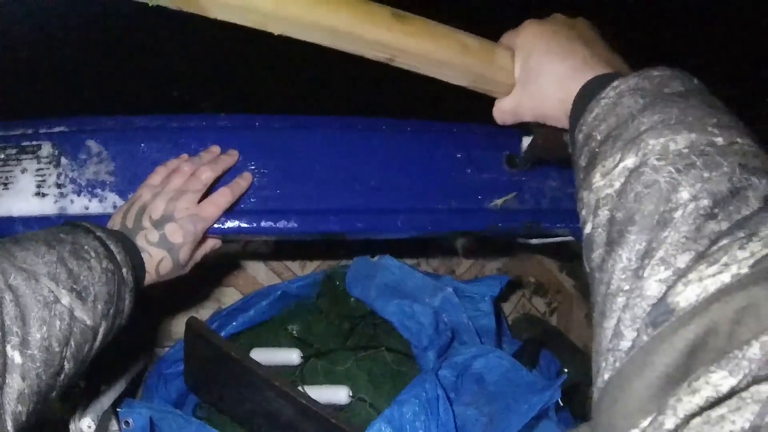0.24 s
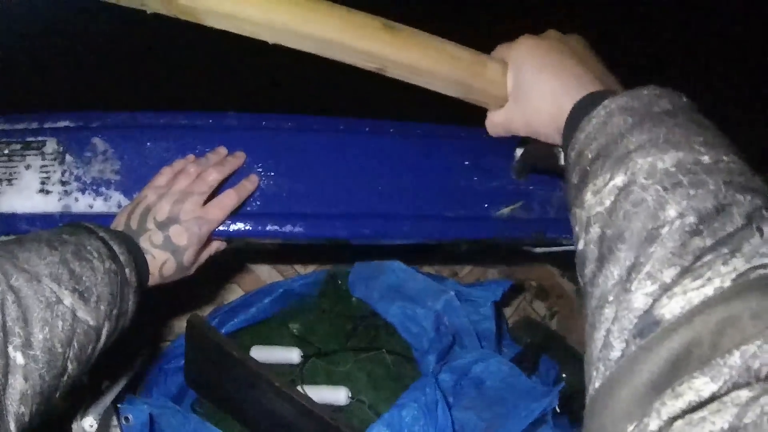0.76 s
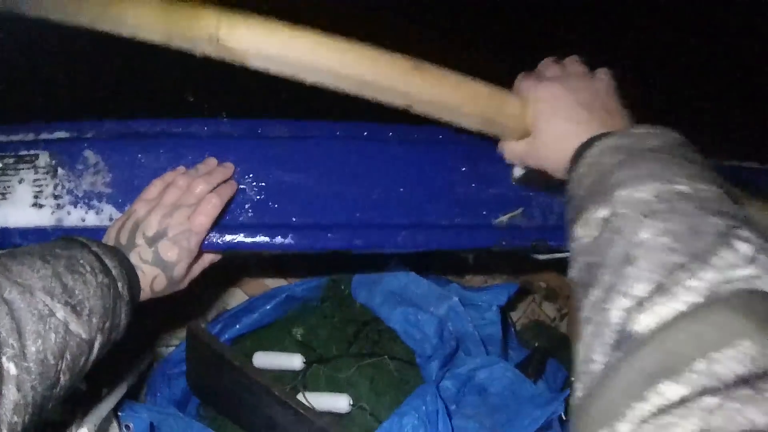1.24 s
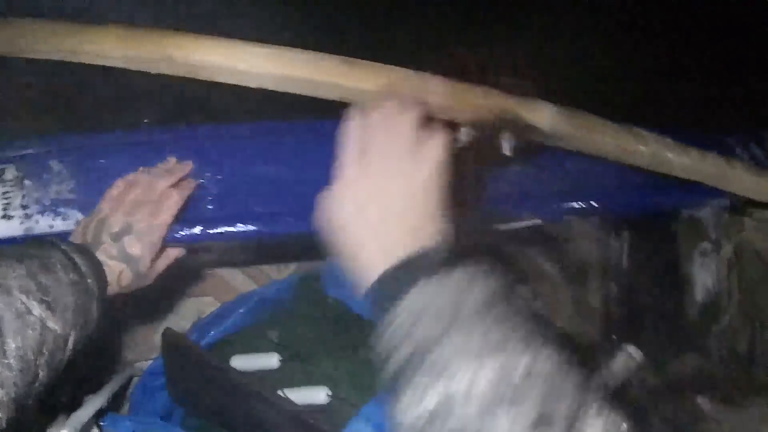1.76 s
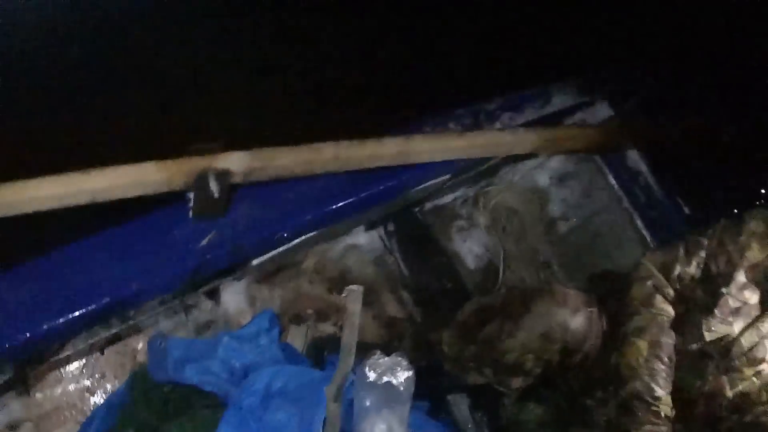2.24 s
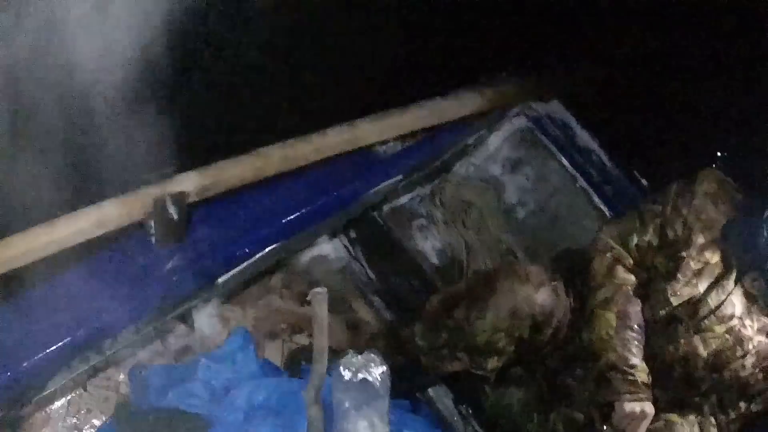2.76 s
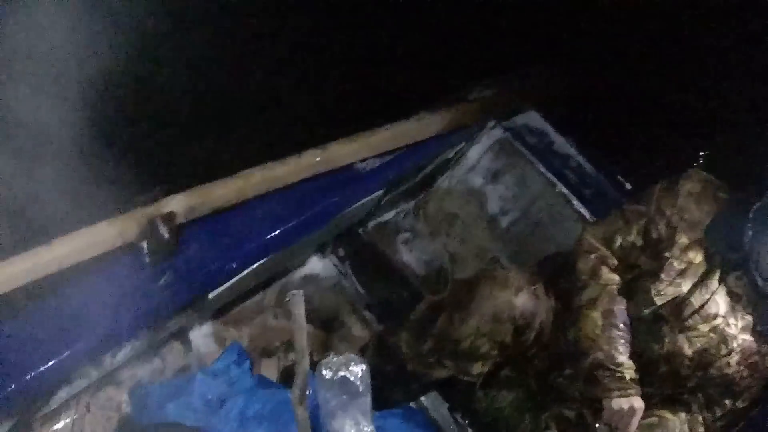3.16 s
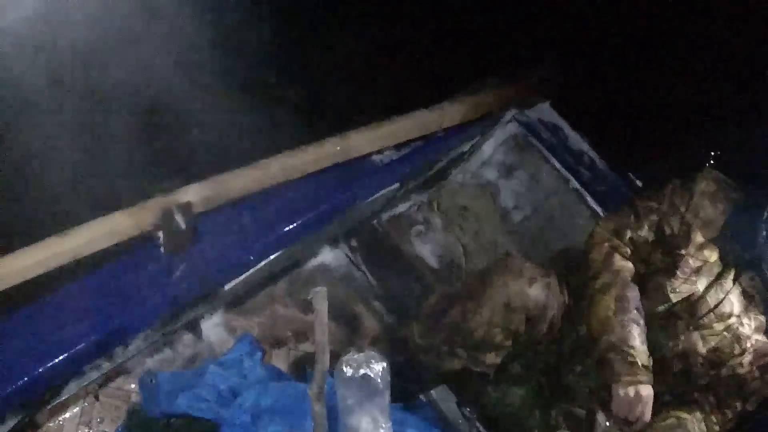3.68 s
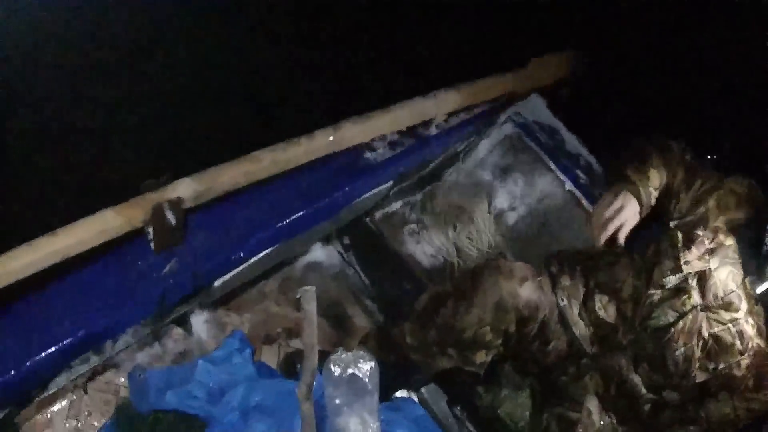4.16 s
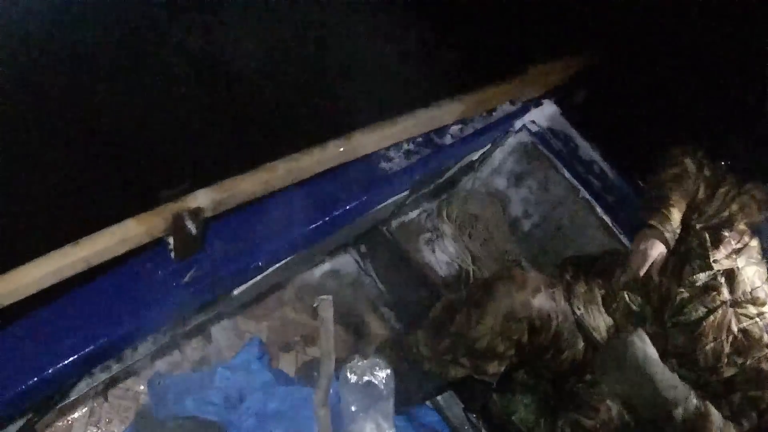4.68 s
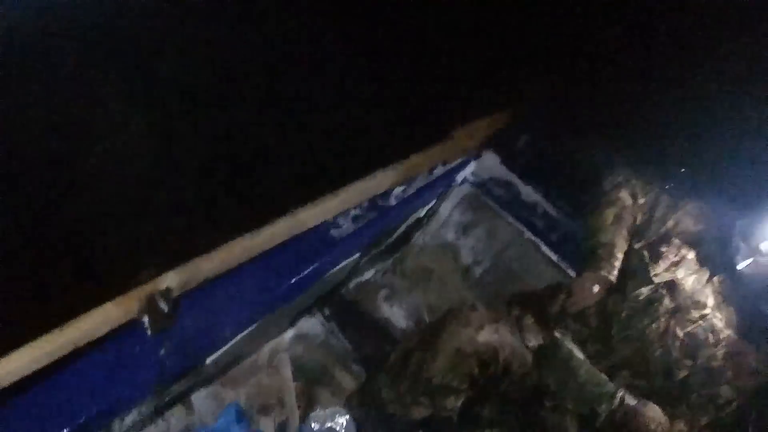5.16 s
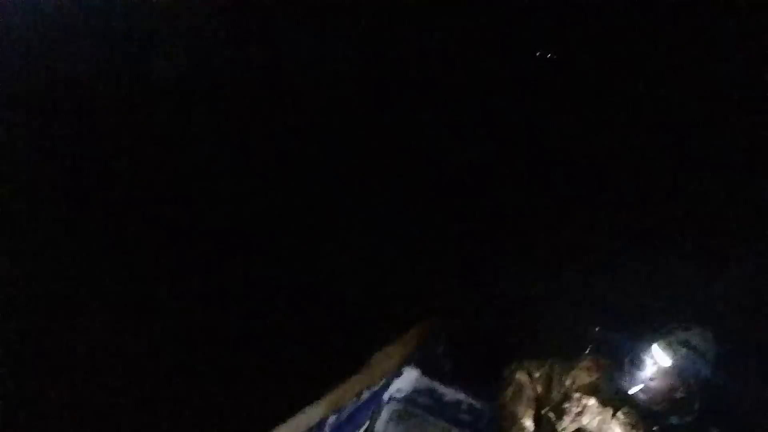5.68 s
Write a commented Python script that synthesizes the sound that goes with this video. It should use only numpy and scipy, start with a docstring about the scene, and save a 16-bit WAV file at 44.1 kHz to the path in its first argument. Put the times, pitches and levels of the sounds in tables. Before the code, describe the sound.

On still water at night, an oar clicks, drags and drops with one hard knock against a small boat, followed by lighter knocks.

```python
"""A low night drone and light clicks from an oarlock: a wooden oar is swung inboard on a small boat.
It scrapes, rattles in the lock and drops on the side with one hard knock; lighter knocks and a clatter
follow. Each blow is a thud on wood and a clack in the lock, both ringing the modes of hull and oar.
Air pockets sing as water laps the hull, and a jacket rustles. Still, open water: no echo."""
import sys
import numpy as np
from scipy import signal
from scipy.fft import rfft, irfft, next_fast_len
from scipy.io import wavfile

SR = 44100
rng = np.random.default_rng(int(sys.argv[2]) if len(sys.argv) > 2 else 0)


def generate_wav(signal):
    """Clip the signal to [-1, 1] and save it as 16-bit WAV at the path in sys.argv[1]."""
    frames = np.transpose(np.atleast_2d(signal))
    scaled = np.clip(frames, -1, 1) * 32767
    pcm = np.round(scaled).astype(np.int16)
    wavfile.write(sys.argv[1], SR, pcm)


N = 261557

# background spectrum (frequency [Hz], relative density [dB])
NIGHT_SPECTRUM = [(12, -21), (22, -9), (40, -3.5), (120, -5.5), (165, -11.5), (230, -3.5), (370, -9.5),
                  (480, -18), (650, -23.5), (1300, -33.5), (4000, -34), (8000, -36), (15000, -39.5)]
# background left-right likeness (frequency [Hz], correlation [0-1])
NIGHT_CORRELATION = [(1000, 1), (2500, 0.99), (5000, 0.71), (8000, 0.44), (15000, 0.31)]
# distant drone, thin whine (centre [Hz], width [Hz], level [dB])
DRONE_BANDS = [(284.7, 14, -56.5), (9630, 140, -85.5)]
# cloth friction spectrum (frequency [Hz], gain [dB])
CLOTH_SPECTRUM = [(300, 0), (800, 1.5), (1400, 1.5), (1800, 3.5), (2200, 1), (2700, -0.5), (3400, -7),
                  (4300, -5.5), (5200, -10.5), (6400, -11), (8000, -23.5), (14000, -37)]
# arm and body moves (start [s], length [s], level [dB])
JACKET_MOVES = [(.95, 0.38, -56.5), (1.4, .1, -51.5), (1.8, 0.15, -56.5), (1.94, 0.65, -55),
                (3.08, 0.19, -60.5), (3.68, .5, -63), (4.16, .11, -54.5), (4.63, 0.34, -59),
                (5.32, 0.69, -56)]
# water at the hull (start [s], length [s], start pitch [Hz], end pitch [Hz], level [dB], froth [0-1])
WATER_LAPS = [(.74, 0.044, 940, 750, -60, 0), (0.885, 0.074, 812, 684, -55.5, 0.4),
              (0.892, 0.053, 1195, 1210, -58, 0.1), (2.836, 0.027, 573, 686, -54.5, 0.1),
              (2.863, 0.026, 650, 600, -58, 0.1), (3.408, 0.036, 488, 854, -55.5, 0),
              (3.438, 0.028, 955, 1350, -63.5, 0), (3.512, 0.026, 950, 770, -57, 1),
              (3.531, 0.044, 680, 533, -57, 0.3), (3.785, 0.045, 1270, 1500, -61, 1),
              (4.262, 0.073, 776, 635, -59, 0)]
# main modes of hull and oar (frequency [Hz], relative level [dB], t60 [s])
BOAT_MODES = [(65.3, -12, 1), (85.75, -9, 0.67), (103.7, -15, 0.46), (124, -18.5, 0.61),
              (171.3, -12.5, 0.22), (180.5, -9, 0.17), (227.4, -12, 0.24), (294.2, -1, 0.24),
              (316, -4.5, 0.12), (390.3, -3.5, 0.18), (439, 5, 0.08), (522.4, 1, 0.12), (605, -4, 0.094),
              (645, -8, 0.065), (712, -5, 0.053), (767, 0, 0.12), (874, -13.5, 0.082), (931, -1, 0.0816),
              (1011, -2.5, .09), (1192, 0, 0.084), (1245, -18, 0.08), (1435, -10, 0.084),
              (1668, -10.5, 0.0517), (2114, -10.5, 0.052), (2260, -15, 0.067), (2534, -12.5, 0.063),
              (2770, -3.5, 0.02), (2980, -12, 0.045), (3600, -21, 0.04), (4115, -3.5, 0.022)]
# dense weak modes between them (frequency [Hz], relative density [dB])
DENSE_SPECTRUM = [(40, -15.5), (70, -17.5), (115, -6.5), (170, 3.5), (330, -0.5), (550, -2), (1050, -5),
                  (2000, -13.5), (2800, -17.5), (4200, -14.5), (4900, -19), (6700, -16.5), (7900, -33),
                  (15000, -43)]
# their decay (frequency [Hz], t60 [s])
DENSE_DECAY = [(80, 0.54), (250, 0.14), (500, 0.17), (1000, 0.098), (2500, 0.057), (6000, 0.041),
               (12000, 0.036)]
# oar dragging in the lock and along the side (start [s], length [s], level [dB])
OAR_DRAGS = [(.66, 0.22, -51.5), (.975, 0.17, -44), (1.22, 0.14, -47.5), (1.355, 0.1, -46),
             (2.03, 0.23, -51.5), (2.47, 0.14, -50), (3.05, 0.085, -49), (3.15, 0.16, -45),
             (4.945, 0.1, -37.5), (5.07, 0.15, -42)]
# oar blows (time [s], thud level [dB], hollow note [Hz], slack [s], clack level [dB], clink [Hz])
OAR_BLOWS = [(0.093, -75, 230, 0, -43.5, 3800), (0.456, -55.5, 170, 0.0026, -77, 4020),
             (0.662, -50.5, 220, 0, -74, 2780), (0.998, -50, 510, 0.0052, -72, 2670),
             (1.024, -44.5, 350, 0.023, -72, 2200), (1.076, -57, 250, 0.005, -48.5, 6040),
             (1.087, -44.5, 217, 0.0079, -50.5, 1540), (1.109, -47.5, 440, 0, -32, 3060),
             (1.183, -45.5, 1000, 0, -43.5, 1340), (1.194, -39.5, 490, 0, -48.5, 2750),
             (1.222, -31.5, 247, 0, -40, 5040), (1.286, -39.5, 183, .004, -43.5, 3095),
             (1.4701, -17.5, 578, 0.00073, -15.5, 2780), (1.502, -28, 304, 0.00075, -41.5, 6240),
             (1.511, -40, 507, 0.00099, -31, 2470), (1.575, -42, 157, 0.0099, -67, 2800),
             (2.155, -53, 260, 0, -64, 2600), (2.214, -49.5, 340, 0.0027, -51, 1660),
             (2.512, -49.5, 99, 0.0028, -57, 2800), (2.563, -48.5, 104, 0.00094, -55.5, 2870),
             (3.051, -49, 403, 0, -45, 2090), (3.056, -47.5, 460, 0.0045, -45, 2870),
             (3.069, -48, 124, 0, -46, 2800), (3.221, -54, 520, 0.0049, -49, 2820),
             (3.236, -39, 490, 0, -48, 2380), (3.678, -71.5, 900, 0, -56.5, 1560),
             (3.944, -51, 1050, 0, -49, 2350), (4.338, -57, 130, 0, -80, 3230),
             (4.668, -48.5, 235, 0.0026, -53.5, 2480), (4.944, -29.5, 370, .005, -38.5, 4060),
             (4.962, -29, 193, 0.0015, -43.5, 2550), (4.999, -58, 330, 0.0014, -44, 3960),
             (5.067, -30, 443, 0.014, -48.5, 2860), (5.122, -37, 920, 0.013, -43.5, 3960),
             (5.148, -33.5, 203, 0, -44.5, 1530), (5.297, -59.5, 280, 0.0025, -59.5, 2160),
             (5.747, -51, 288, 0, -53, 2000)]
# boom, knock, crack and tick bands (low edge [Hz], centre [Hz], high edge [Hz])
ATTACK_BANDS = [(50, 200, 350), (350, 700, 1400), (1400, 2600, 4500), (4500, 6000, 12000)]
# band offsets of thud and clack (boom [dB], knock [dB], crack [dB], tick [dB])
THUD_OFFSETS_DB = (0.5, -0.5, -15.5, -43)
CLACK_OFFSETS_DB = (-20, -10, 1, -19)


def gain_of(db):
    """Decibels to amplitude."""
    return 10 ** (np.asarray(db) / 20)


def unit_rms(x):
    """Scales to rms 1."""
    return x / np.sqrt(np.mean(x ** 2) + 1e-20)


def lookup(table, hz):
    """Interpolates on a log-frequency axis."""
    table_hz, value = np.transpose(table)
    return np.interp(np.log(hz + 1), np.log(table_hz + 1), value)


def add(mix, start_s, sound):
    """Mixes a sound in at start_s."""
    part = mix[round(start_s * SR):][:len(sound)]
    part += sound[:len(part)]


def coloured(x, spectrum):
    """Zero-phase filter, output at rms 1."""
    size = next_fast_len(len(x), True)
    gain = gain_of(lookup(spectrum, np.fft.rfftfreq(size, 1 / SR)))
    return unit_rms(irfft(rfft(x, size) * gain, size)[:len(x)])


def min_phase(x, spectrum, size=4096):
    """Minimum-phase filter: nothing sounds before the blow."""
    gain = gain_of(lookup(spectrum, np.fft.rfftfreq(size, 1 / SR)))
    cepstrum = irfft(np.log(gain))
    cepstrum[1:size // 2] *= 2
    cepstrum[size // 2 + 1:] = 0
    taps = np.array(irfft(np.exp(rfft(cepstrum))), ndmin=x.ndim)
    return signal.fftconvolve(x, taps, axes=-1)[..., :x.shape[-1]]


def resonance(x, hz, q, db):
    """Adds one resonant peak."""
    return x + gain_of(db) * signal.lfilter(*signal.iirpeak(hz, q, SR), x)


def wander(rate_hz, size):
    """Low-passed noise, rms 1."""
    return coloured(rng.standard_normal(size), [(rate_hz, 0), (2 * rate_hz, -30), (8 * rate_hz, -120)])


def strokes(moves, skew, roundness):
    """Sliding envelope: each move speeds up and slows in one arch."""
    out = np.zeros(N)
    for start_s, length_s, db in moves:
        progress = np.linspace(0, 1, int(length_s * SR))
        add(out, start_s, gain_of(db) * abs(np.sin(np.pi * progress ** skew)) ** roundness)
    return out


def attack_db(x, low_hz=0, high_hz=SR, size=1024):
    """Band level over the first samples."""
    hz = np.fft.rfftfreq(2 * size, 1 / SR)
    fade = np.minimum(np.linspace(5, 0, size), 1)
    power = abs(rfft(x[:size] * fade, 2 * size)) ** 2
    return 10 * np.log10(power[(hz >= low_hz) & (hz < high_hz)].sum() / size ** 2 + 1e-20)


def voiced(ring, bands_db):
    """Filters a ring towards the given attack levels of boom, knock, crack and tick."""
    spectrum = [(centre_hz, db - attack_db(ring, low_hz, high_hz))
                for db, (low_hz, centre_hz, high_hz) in zip(bands_db, ATTACK_BANDS)]
    return min_phase(ring, spectrum)


def night(air_db=-51, swell_db=2.03, swell_hz=4.9):
    """Wavering rumble, drone and whine in the centre; fine hiss spread wide."""
    size = next_fast_len(N, True)
    hz = np.fft.rfftfreq(size, 1 / SR)
    correlation = np.clip(lookup(NIGHT_CORRELATION, hz), 0, 1)
    spectra = rfft(rng.standard_normal((2, size))) * gain_of(lookup(NIGHT_SPECTRUM, hz))
    mid, side = spectra * np.sqrt([1 + correlation, 1 - correlation])
    air = gain_of(air_db) * unit_rms(irfft(np.array([mid + side, mid - side]), size))
    rumble = signal.sosfilt(signal.butter(1, 400, fs=SR, output="sos"), air)
    air += rumble * (gain_of(swell_db * wander(swell_hz, size)) - 1)
    for centre_hz, width_hz, db in DRONE_BANDS:
        peak = 1 / (1 + (2 * (hz - centre_hz) / width_hz) ** 2)
        air += gain_of(db) * unit_rms(irfft(rfft(rng.standard_normal(size)) * peak, size))
    return air[:, :N]


def jacket(floor_db=-63.5, grain_db=1.5, grain_hz=107):
    """Cloth slides on cloth in small uneven catches, never quite at rest."""
    speed = np.hypot(gain_of(floor_db), strokes(JACKET_MOVES, skew=0.93, roundness=0.49))
    friction = rng.standard_normal(N) * gain_of(grain_db * wander(grain_hz, N))
    return speed * coloured(friction, CLOTH_SPECTRUM)


def laps(waver=0.1, waver_hz=140, noise_size=8192):
    """Air pockets close against the hull: a short gliding note in a splash of froth."""
    out = np.zeros(N)
    for start_s, length_s, start_hz, end_hz, db, froth in WATER_LAPS:
        size = int(length_s * SR)
        hz = np.geomspace(start_hz, end_hz, size) * (1 + waver * wander(waver_hz, noise_size)[:size])
        note = unit_rms(np.sin(2 * np.pi * np.cumsum(hz) / SR))
        spectrum = [(start_hz / 3, -18), (start_hz, 0), (start_hz * 2, -11), (start_hz * 8, -40)]
        splash = coloured(rng.standard_normal(noise_size), spectrum)[:size]
        envelope = np.sin(np.pi * np.sqrt(np.linspace(0, 1, size)))
        lap = envelope * (np.sqrt(1 - froth) * note + np.sqrt(froth) * splash)
        add(out, start_s, gain_of(db) * unit_rms(lap))
    return out


def main_modes(count, t, spread_db=3.5, spread_rad=1.0):
    """Damped modes of hull and oar; each struck spot favours different ones."""
    hz, db, t60_s = np.transpose(BOAT_MODES)[:, :, None]
    bank = gain_of(db) * np.exp((2j * np.pi * hz - np.log(1000) / t60_s) * t)
    strength, phase = rng.standard_normal((count, len(hz), 2)).transpose(2, 0, 1)
    weights = gain_of(spread_db * strength) * np.exp(1j * spread_rad * phase)
    onset = np.minimum(np.arange(len(t)) / 16, 1)
    return (weights @ bank).imag * onset


def dense_modes(count, size):
    """Many weak modes as decaying noise; treble dies first."""
    hz, t, frames = signal.stft(rng.standard_normal((count, size)), SR, nperseg=256)
    decay = np.exp(-np.log(1000) * t / lookup(DENSE_DECAY, hz)[:, None])
    _, tails = signal.istft(frames * decay, SR, nperseg=256)
    return min_phase(tails[:, :size], DENSE_SPECTRUM)


def boat_rings(count, size=16384, contact_db=-5, contact_s=0.0024,
               thock_db=-4, thock_hz=620, thock_s=0.0016):
    """Impact responses, one row a blow: modes, contact burst, thock of struck wood."""
    t = np.arange(size) / SR
    modes = main_modes(count, t)
    dense = dense_modes(count, size)
    contact = min_phase(rng.standard_normal((count, size)) * np.exp(-t / contact_s), DENSE_SPECTRUM)
    thock = np.sin(2 * np.pi * thock_hz * t[None]) * np.exp(-t / thock_s)
    rings = np.zeros((count, size))
    for rows, share_db in (modes, 0), (dense, 0), (contact, contact_db), (thock, thock_db):
        rings += rows * gain_of([[share_db - attack_db(row)] for row in rows])
    return rings


def scrape(slips_per_s=420, spread_db=4):
    """Tiny slips of the dragging shaft ring the boat."""
    slips = rng.random(N) < slips_per_s / SR
    strength = gain_of(spread_db * np.clip(rng.standard_normal(N), -2, 2))
    force = slips * strength * rng.choice([-1, 1], N)
    ringing = signal.oaconvolve(force, boat_rings(count=1)[0])[:N]
    spectrum = [(100, 2), (300, 2.5), (550, -6.5), (1000, -3), (2000, -2), (3200, 1), (5000, -9.5)]
    return strokes(OAR_DRAGS, skew=0.96, roundness=0.82) * coloured(ringing, spectrum)


def clack(ring, db, clink_hz, bite_s=0.00035, pivot_hz=2897, db_per_octave=9):
    """The lock bites on its stop: higher clink, more tick, less boom and knock."""
    bite = 1 - np.exp(-np.arange(len(ring)) / SR / bite_s)
    clink = resonance(ring * bite, clink_hz, q=7, db=3)
    tilt_db = db_per_octave * np.log2(clink_hz / pivot_hz) * np.array([-1, -1, 0, 1])
    return voiced(clink, db + tilt_db + CLACK_OFFSETS_DB)


def thud(ring, db, note_hz, pivot_hz=450, db_per_octave=4):
    """Wood meets the hull: lower note, more boom, less of every band above."""
    body = resonance(ring, note_hz, q=0.59, db=-0.5)
    hollow = resonance(body, note_hz, q=5.1, db=6.5)
    tilt_db = db_per_octave * np.log2(pivot_hz / note_hz) * np.array([1, -1, -1, -1])
    return voiced(hollow, db + tilt_db + THUD_OFFSETS_DB)


def blows(low_cut_hz=58):
    """Each blow rings the boat twice: a thud, and a clack once the lock takes up its slack."""
    # the blows keep no deep bass below the cut
    bass_cut = signal.butter(3, low_cut_hz, "highpass", fs=SR, output="sos")
    count = len(OAR_BLOWS)
    hull_rings = signal.sosfilt(bass_cut, boat_rings(count))
    lock_rings = signal.sosfilt(bass_cut, boat_rings(count, 8192, contact_db=-2.5, contact_s=0.0022))
    out = np.zeros(N)
    for blow, hull, lock in zip(OAR_BLOWS, hull_rings, lock_rings):
        time_s, thud_db, note_hz, slack_s, clack_db, clink_hz = blow
        add(out, time_s, thud(hull, thud_db, note_hz))
        add(out, time_s + slack_s, clack(lock, clack_db, clink_hz))
    return out


def scene():
    """Boat sounds close and central over the stereo night."""
    return blows() + scrape() + laps() + jacket() + night()


def record(dry):
    """Soft clip at full scale, then low-pass."""
    clipped = dry / (1 + dry ** 6) ** (1 / 6)
    cutoff_hz = 15400
    taps = signal.firwin(511, cutoff_hz, window=("kaiser", 9), fs=SR)
    return signal.oaconvolve(clipped, taps[None], "same")


dry = scene()
out = record(dry)
generate_wav(out)
```